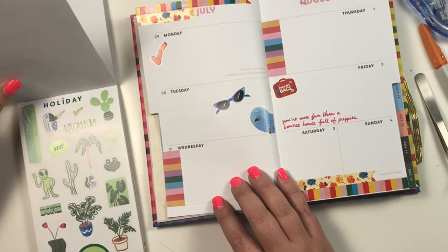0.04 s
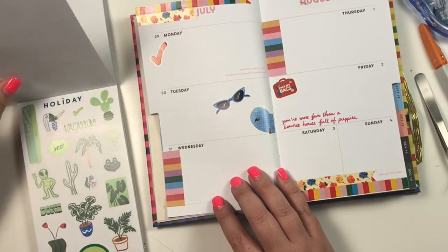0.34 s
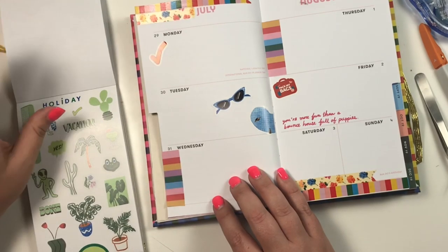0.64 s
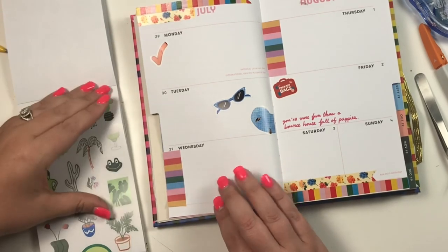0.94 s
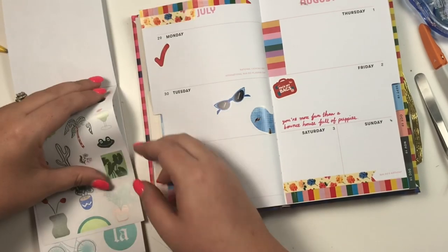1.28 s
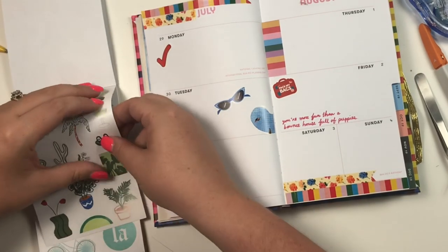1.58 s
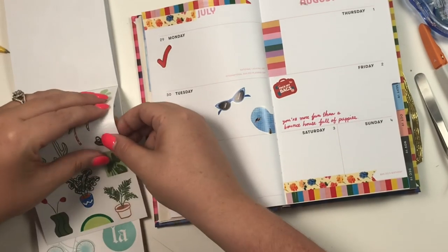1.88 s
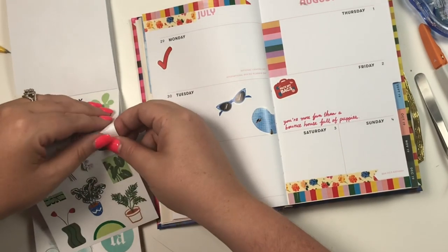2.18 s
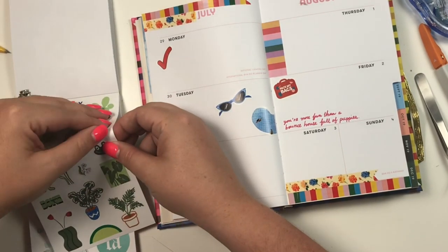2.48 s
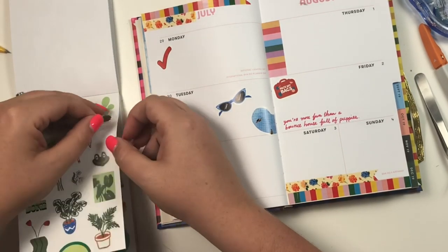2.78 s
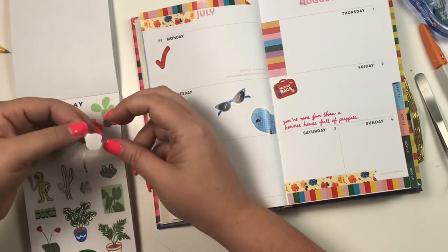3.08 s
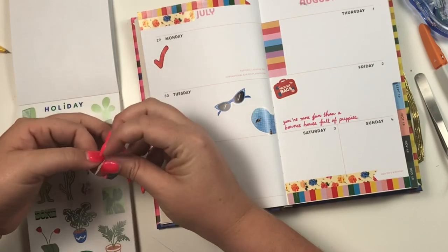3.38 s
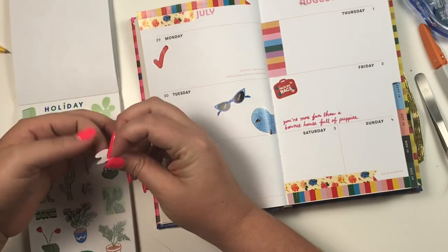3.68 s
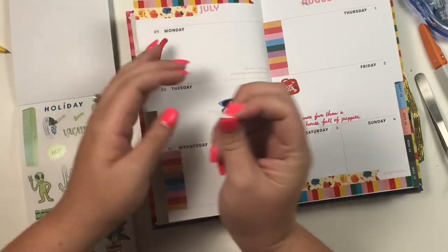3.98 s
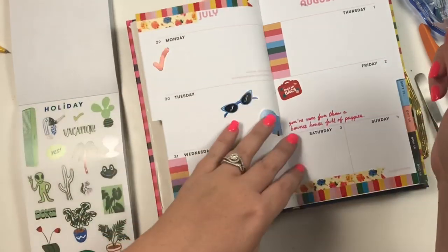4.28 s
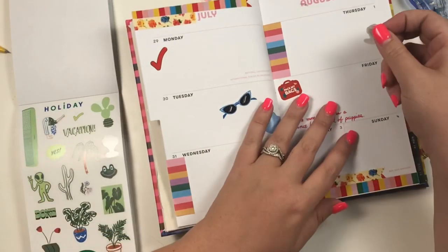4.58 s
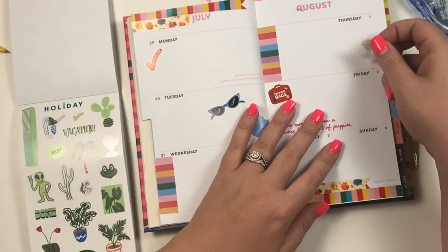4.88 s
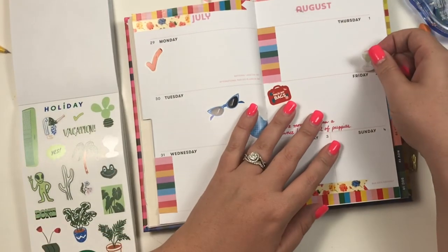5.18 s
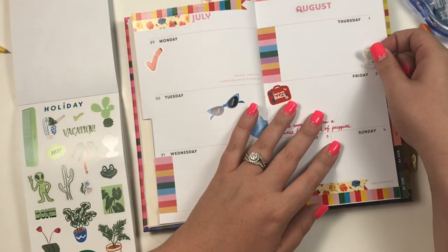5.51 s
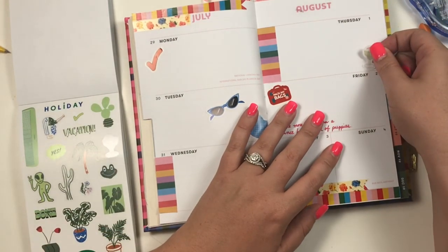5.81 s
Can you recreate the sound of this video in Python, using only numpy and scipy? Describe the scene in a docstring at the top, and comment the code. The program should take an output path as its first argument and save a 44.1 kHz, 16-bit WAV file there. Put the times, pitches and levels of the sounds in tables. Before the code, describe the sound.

A fan gives a low, steady hum with a soft rush of air throughout, in a small room with little echo. During the first second a stiff sticker sheet makes a few faint snaps. From about 0.9 seconds fingers slide over the paper with a soft hiss and tap the covers; at 1.4 seconds the sticker book bumps the desk with the loudest knock, and a smaller one follows at 1.7. Between about 2.1 and 2.6 seconds a sticker peels off in tiny, uneven ticks. Crisper snaps come at 2.9 and 3.8 seconds, each leaving a brief low ring. From 4.1 to 4.4 seconds a flat hand brushes and lands on the planner's pages, with a cluster of papery slaps and crackles and a faint deep sway of the desk. Light taps follow at 4.6 and 4.8, with one soft fingertip rub until 5. A last faint snap leaves only the fan.

```python
"""A fan hums in a small room while a sticker is moved from its glossy sheet to a paper planner on a desk.
The stiff backing gives a few faint snaps, then fingers slide over the sheets and knock on the covers;
the hardest knock bumps the sticker book against the desk. The glue lets go in tiny slips, and louder
snaps leave a low ring. A flat hand lands on the page and rocks the desk, and a fingertip
smooths the page with one last rub."""
import sys
import numpy as np
from scipy import signal
from scipy.fft import rfft, irfft
from scipy.io import wavfile

SR = 44100
rng = np.random.default_rng(int(sys.argv[2]) if len(sys.argv) > 2 else 0)


def digitize_waveform(pressure):
    """Quantize a signal to 16-bit integers and store it at the path in sys.argv[1].

    Rows of a 2-D input are taken as channels; values are limited to [-1, 1].
    """
    field = np.atleast_2d(pressure).T
    bounded = np.clip(field, -1, 1)
    quanta = np.round(bounded * 32767).astype(np.int16)
    wavfile.write(sys.argv[1], SR, quanta)


N = 266805
TIME_S = np.arange(N) / SR


def from_db(db):
    """Decibels to gain."""
    return 10 ** (np.asarray(db) / 20)


def unit_rms(x):
    """Scale to rms 1."""
    return x / np.sqrt(np.mean(x ** 2) + 1e-20)


def add(out, start_s, sound):
    """Mix a short sound in at its time."""
    at = round(start_s * SR)
    out[at:at + len(sound)] += sound[:N - at]


def envelope(start_s, attack_s, length_s, release_s):
    """Rise to 1, hold until the length is over, then die away."""
    t = TIME_S - start_s
    return np.clip(t / attack_s, 0, 1) * np.exp(-np.maximum(t - length_s, 0) / release_s)


def drift(rate_hz):
    """Random modulation that glides to a new value rate_hz times a second."""
    knots = rng.standard_normal(4096)
    return np.interp(TIME_S * rate_hz, np.arange(len(knots)), knots)


def grains(per_s, spread_db):
    """Friction texture: random tiny slips of uneven size and sign, at rms 1."""
    sizes = from_db(spread_db * np.minimum(rng.exponential(1, N), 4))
    signs = rng.choice([-1, 1], N)
    return unit_rms(sizes * signs * (rng.random(N) < per_s / SR))


def burst(decay_s, attack_s=0.00079):
    """Countless tiny contacts at once: a quick crackle with a flat spectrum."""
    t = np.arange(SR // 8) / SR
    shape = np.minimum(t / attack_s, 1) * np.exp(-np.maximum(t - attack_s / 2, 0) / decay_s)
    phases = np.angle(rfft(rng.standard_normal(len(t)) * shape, 2 * len(t)))
    return np.linalg.norm(shape) * irfft(np.exp(1j * phases))[:len(t)]


def response(eq, size=8192):
    """Minimum-phase impulse response of an EQ curve, at unit energy."""
    hz, db = np.transpose(eq)
    grid_hz = np.maximum(np.fft.rfftfreq(size, 1 / SR), 1)
    gains = from_db(np.interp(np.log(grid_hz), np.log(hz), db))
    cepstrum = irfft(np.log(gains))
    pulse = irfft(np.exp(rfft(2 * cepstrum[:size // 2], size)))
    return pulse / np.sqrt(np.sum(pulse ** 2))


def coloured(x, eq):
    """Shape a sound with an EQ curve."""
    return signal.fftconvolve(x, response(eq))[:N]


def resonance(x, pitch_hz, width_hz):
    """One resonance, with gain 1 at its peak."""
    r = np.exp(-np.pi * width_hz / SR)
    feedback = [1, -2 * r * np.cos(2 * np.pi * pitch_hz / SR), r * r]
    return signal.lfilter(np.array([1, 0, -1]) * (1 - r * r) / 2, feedback, x + 1e-18)


def ringing(x, modes):
    """A sound plus the ring of the body it touches."""
    return x + sum(from_db(db) * resonance(x, hz, width) for hz, width, db in modes)


# rotor tones: multiple_of_rotation, level_db
ROTOR_TONES = [(4, -89), (6, -59.5), (7, -63.5), (9, -52.5), (10, -62), (18, -71)]
# level ride on those tones: time_s, gain_db
ROTOR_SWELL = [(0, -2), (1.9, -0.5), (3.2, -6), (3.9, -5), (4.4, -1), (6.05, 3.5)]
# rush of moving air: freq_hz, gain_db
AIR_EQ = [(20, -39), (33, -20), (50, -1.5), (80, 0), (140, 2.5), (200, -4), (290, -4), (450, -12),
          (650, -16), (950, -24.5), (2000, -27.5), (3200, -32), (4700, -29), (7000, -34), (16000, -42)]


def fan(hum_hz, hum_db, air_db, waver_db):
    """The motor hums at twice the mains rate; the rotor's tones wander against it, over moving air."""
    hunting = np.cos(2 * np.pi * (TIME_S - 2.93) / 3.65)  # the speed hunts, once every 3.65 s
    turns_per_s = 14.82 + 0.22 * hunting
    angle = 2 * np.pi * np.cumsum(turns_per_s) / SR
    swell_db = np.interp(TIME_S, *np.transpose(ROTOR_SWELL))
    rotor = np.zeros(N)
    for multiple, level_db in ROTOR_TONES:
        level = from_db(level_db + swell_db + waver_db * drift(5))
        rotor += level * np.sin(multiple * angle + 2 * np.pi * rng.random())
    motor = from_db(hum_db) * np.sin(2 * np.pi * hum_hz * TIME_S)
    air = from_db(air_db) * coloured(rng.standard_normal(N), AIR_EQ)
    return np.sqrt(2) * (rotor + motor) + air


# stiff paper and sticker snapping: start_s, edge_db, body_db, flutter_hz, decay_s
SHEET_SNAPS = [(0.128, -72, -60.5, 750, 0.006), (0.275, -66, -67, 900, 0.0044),
               (0.48, -57, -50, 710, 0.0032), (0.569, -68, -63, 840, 0.0019), (0.82, -65, -57, 800, 0.0019),
               (0.979, -53, -55, 850, 0.0033), (1.7003, -52.5, -41, 764, 0.0039),
               (2.552, -67, -52, 900, 0.0017), (2.591, -46.5, -57, 870, 0.0021),
               (2.898, -44, -40, 673, 0.0023), (3.7598, -48, -45, 830, 0.0022),
               (3.7719, -39, -46, 807, 0.0023), (3.779, -57, -62, 815, 0.003),
               (4.102, -58, -50, 805, 0.0024), (4.1404, -55, -44, 696, 0.0027),
               (4.165, -59, -43, 780, 0.002), (4.3, -50, -53, 760, 0.0019), (4.436, -50, -38, 730, 0.0031),
               (5.25, -65, -62, 780, 0.0023)]
# a snap's papery body and its bright edge: freq_hz, gain_db
SNAP_BODY_EQ = [(150, -14), (300, 19), (600, 1.5), (1000, 2.5), (1300, 2), (2000, 3.5), (3200, -0.5),
                (5500, -1.5), (7000, -6.5), (16000, -40)]
SNAP_EDGE_EQ = [(1000, -74), (3000, 4), (5500, 7), (7500, 5), (10000, 5.5), (13000, 4), (16000, 4)]
# ring of the small stiff sheet: pitch_hz, width_hz, gain_db
SHEET_MODES = [(655, 100, 6), (1694, 63, 4.5), (2710, 100, -9), (3410, 180, 0), (4050, 160, -6),
               (5570, 250, -0.5), (12600, 1800, -3)]


def sheet_snaps(body_trim_db, edge_trim_db, flutter_feedback):
    """A buckling sheet lets go in a short crackle; the freed edge flutters and the sheet rings."""
    out = np.zeros(N)
    for start_s, edge_db, body_db, flutter_hz, decay_s in SHEET_SNAPS:
        body = from_db(body_db + body_trim_db) * coloured(burst(decay_s), SNAP_BODY_EQ)
        edge = from_db(edge_db + edge_trim_db) * coloured(burst(decay_s), SNAP_EDGE_EQ)
        flutter_comb = np.r_[1, np.zeros(round(SR / flutter_hz) - 1), -flutter_feedback]
        add(out, start_s, signal.lfilter([1], flutter_comb, body + edge))
    return ringing(out, SHEET_MODES)


# strokes of skin over paper: start_s, length_s, hiss_db, drag_db, gloss_re_hiss_db
FINGER_STROKES = [(0.917, 0.24, -61, -62.5, -14), (1.137, 0.19, -52.5, -61.5, -14),
                  (1.28, 0.19, -54, -61, -12.5), (1.46, 0.21, -59, -62, -9.5),
                  (1.675, 0.4, -65.5, -58.5, -9), (1.86, 0.059, -60, -59.5, -13),
                  (1.98, 0.046, -66, -58.5, -12), (2.073, 0.049, -62, -66, -8),
                  (2.23, 0.078, -65.5, -62.5, -14), (2.574, 0.093, -61.5, -71, -10),
                  (2.736, 0.058, -61.5, -63, -12), (3.072, 0.027, -60.5, -65, -14),
                  (3.96, 0.31, -60.5, -60, -9.5), (4.148, 0.13, -48.5, -53.5, -9.5),
                  (4.25, 0.021, -40.5, -44, -17.5), (4.33, 0.09, -62, -58, -11),
                  (4.421, 0.39, -58.5, -57, -12), (4.831, 0.15, -60, -69, -18)]
# fibre hiss, airy skating on the gloss and dull drag on the page: freq_hz, gain_db
HISS_EQ = [(500, 11), (2000, 3.5), (4500, 8.5), (5700, 7), (6500, -1.5), (8300, 3.5), (10500, -5.5),
           (13000, 0), (16000, -9)]
GLOSS_EQ = [(4000, -37), (7000, 0), (8500, -2), (10500, -2), (12500, 1), (14500, -4), (16000, 4)]
DRAG_EQ = [(250, -1), (550, -5), (850, -5.5), (1200, -8.5), (1550, -5.5), (2100, -5.5), (2700, -12.5),
           (4000, -19), (7000, -29), (16000, -40)]


def finger_slides(hiss_trim_db, drag_trim_db, uneven_db, patchy_db, sag_db_per_s):
    """Paper fibres hiss under moving skin, which skates in patches over the gloss and drags on the page."""
    hiss_level = drag_level = gloss_level = 0
    for start_s, length_s, hiss_db, drag_db, gloss_db in FINGER_STROKES:
        easing = from_db(-sag_db_per_s * np.maximum(TIME_S - start_s, 0))
        effort = easing * envelope(start_s, attack_s=0.013, length_s=length_s, release_s=0.023)
        hiss_level = np.maximum(hiss_level, from_db(hiss_db) * effort)
        drag_level = np.maximum(drag_level, from_db(drag_db) * effort)
        gloss_level = np.maximum(gloss_level, from_db(hiss_db + gloss_db) * effort)
    grip_db = uneven_db * drift(60)
    fibres = hiss_level * from_db(hiss_trim_db + grip_db) * grains(per_s=14000, spread_db=2.5)
    drag = drag_level * from_db(drag_trim_db + grip_db) * grains(per_s=5000, spread_db=1.8)
    skating = gloss_level * from_db(patchy_db * drift(25)) * grains(per_s=6000, spread_db=2.5)
    return coloured(fibres, HISS_EQ) + coloured(skating, GLOSS_EQ), coloured(drag, DRAG_EQ)


# ring of the planner's pages: pitch_hz, width_hz, gain_db
PAGE_MODES = [(356, 19, -5), (518, 17, 4.5), (626, 30, 3), (817, 69, 0.5), (1128, 73, -3.5), (1816, 62, 3),
              (2000, 28, -4.5), (2096, 22, -5), (2554, 54, 9), (3610, 90, -3)]


def page_ring(contact):
    """The stack of pages resonates under a touch."""
    return ringing(contact, PAGE_MODES)


# ring of the desk with the books on it: pitch_hz, width_hz, gain_db
DESK_MODES = [(99.7, 11.7, 19), (258, 13, 6), (359, 5.8, 12.5), (800, 53, -5.5), (1160, 200, 3.5),
              (2015, 130, -2), (3040, 200, 1), (3870, 100, -0.5), (5460, 150, 6)]


def desk_ring(contact):
    """The desk acts as a soundboard for the books lying on it."""
    return ringing(contact, DESK_MODES)


# finger knocks on the covers, and the low ring after the loudest sheet snaps (2.908 and 3.772 s):
# start_s, level_db, tick_re_level_db, pitch_hz, width_hz
KNOCKS_AND_SNAP_RINGS = [(0.985, -43, -4, 845, 70), (1.1545, -32, -7.5, 850, 120),
                         (1.166, -46, -20, 1180, 110), (1.291, -42.5, -21, 1190, 120),
                         (1.3858, -12, -16, 920, 378), (1.4015, -26, -21, 750, 260),
                         (1.591, -44.5, 0, 620, 260), (1.668, -45.5, -4, 1490, 300),
                         (1.701, -33, -17, 885, 260), (2.843, -42, -25, 646, 130),
                         (2.908, -47, -22, 685, 70), (3.762, -53, -12, 800, 185),
                         (3.772, -41, -15, 620, 50), (4.1445, -26.5, -10, 674, 150),
                         (4.233, -32.5, -17, 636, 120), (4.623, -38, -3, 836, 185),
                         (4.841, -39, -1.5, 840, 200), (4.848, -45, -22, 775, 60)]
# dull push and sharp tick: freq_hz, gain_db
PUSH_EQ = [(40, -33), (90, -0.5), (200, -5.5), (400, -15.5), (650, 1), (950, -7), (1400, -11), (2200, -8.5),
           (3000, -11), (5500, -21.5), (7500, -25.5), (16000, -42)]
TICK_EQ = [(500, -47), (1500, 14.5), (2500, 6), (5500, 1.5), (6800, -7), (16000, -18)]


def knocks_and_snap_rings(push_trim_db, tick_trim_db, push_delay_s, ring_db, ring_ref_width_hz):
    """A tick, then a dull push that rings at its own pitch; in a knock these are nail and fingertip."""
    ticks, rings = np.zeros(N), np.zeros(N)
    push = response(PUSH_EQ)
    for start_s, level_db, tick_db, pitch_hz, width_hz in KNOCKS_AND_SNAP_RINGS:
        add(ticks, start_s, from_db(level_db + tick_db + tick_trim_db) * burst(decay_s=0.0035))
        ring_gain = from_db(ring_db) * np.sqrt(ring_ref_width_hz / width_hz)
        swing = push + ring_gain * resonance(push, pitch_hz, width_hz)
        add(rings, start_s + push_delay_s, from_db(level_db + push_trim_db) * swing / np.abs(swing).max())
    return coloured(ticks, TICK_EQ) + rings


def cover_smear(x, below_hz, stages):
    """Bending waves in a stiff cover: the low ones travel slower and arrive a little later."""
    pole = np.exp(-2 * np.pi * below_hz / SR)
    allpass = [-pole, 1, 0, 1, -pole, 0]
    return signal.sosfilt([allpass] * stages, x + 1e-18)


# low notes of the desk's thud: pitch_hz, level_db, t60_s
THUD_MODES = [(153, -42, 0.095), (274, -40, 0.28), (363, -40.5, 0.14), (605, -29, 0.1)]


def book_thud(start_s):
    """The sticker book bumps the desk and sets off its low modes."""
    t, out = np.arange(SR // 2) / SR, np.zeros(N)
    for pitch_hz, level_db, t60_s in THUD_MODES:
        add(out, start_s, from_db(level_db - 60 * t / t60_s) * np.sin(2 * np.pi * pitch_hz * t))
    return out


# the glue letting go: start_s, level_db, decay_s
GLUE_SLIPS = [(1.79, -51, 0.0016), (2.0903, -40, 0.0013), (2.243, -48, 0.0018), (2.3258, -50.5, 0.0016),
              (2.3628, -44.5, 0.0012), (2.372, -46.5, 0.0014), (2.391, -48, 0.0018),
              (2.3975, -48.5, 0.0018), (2.4122, -46, 0.0016), (2.435, -51, 0.0022), (2.451, -48, 0.0034),
              (2.4588, -46.5, 0.0035), (2.4823, -48.5, 0.002), (2.5, -46.5, 0.0016), (2.519, -46, 0.0012),
              (2.5343, -44, 0.0015), (2.5517, -41, 0.0011), (2.842, -45, 0.0012), (2.884, -48, 0.0011)]
# tone of the sheet plucked by the glue: freq_hz, gain_db
GLUE_EQ = [(300, 1.5), (540, 5), (750, -16), (1050, 2), (1400, -3.5), (1800, 2), (2150, 2.5), (2800, -17),
           (4200, -10), (8000, -16), (16000, -15)]


def glue_peel(trim_db, soften_hz):
    """The glue holds, then gives way in a tick or a longer tear; each slip softly plucks the sheet."""
    plucks = np.zeros(N)
    for start_s, level_db, decay_s in GLUE_SLIPS:
        add(plucks, start_s, from_db(level_db + trim_db) * burst(decay_s))
    softened = signal.sosfilt(signal.butter(1, soften_hz, fs=SR, output="sos"), plucks)
    return coloured(softened, GLUE_EQ)


def desk_rock(start_s, pitch_hz, level_db):
    """The whole desk sways at its lowest mode under the weight of the hand."""
    level = from_db(level_db) * envelope(start_s, attack_s=0.04, length_s=0.04, release_s=0.29)
    wavering_hz = pitch_hz * (1 + 0.056 * drift(18))
    return level * np.sqrt(2) * np.sin(2 * np.pi * np.cumsum(wavering_hz) / SR)


# the hand landing, fingers first and then the palm: start_s, slap_db, brush_db, pitch_hz, ring_db
HAND_CONTACTS = [(4.123, -43.5, -66, 1250, 4), (4.131, -42.5, -56, 1190, 0), (4.138, -39.5, -44, 630, 6),
                 (4.147, -40.5, -46, 1140, 10), (4.164, -41.5, -50, 1080, 6), (4.183, -62, -58, 1850, 0),
                 (4.268, -53, -35, 2300, 0), (4.2772, -25, -27, 827, 6), (4.2821, -26.5, -32, 2040, 2),
                 (4.2909, -27, -28, 520, -4), (4.303, -27.5, -40, 864, 5), (4.3122, -33.5, -60, 1140, 10),
                 (4.334, -47, -62, 370, 12), (4.354, -43, -56, 1820, -5)]
# fleshy slap and papery brush: freq_hz, gain_db
SLAP_EQ = [(30, -15), (50, -17), (100, -9.5), (220, 3), (430, -0.5), (850, 1.5), (1150, -2), (1500, -2),
           (2200, 2), (3200, -10), (4000, -10), (5500, -33), (7000, -30), (16000, -73)]
BRUSH_EQ = [(1200, -25), (2600, 8), (3800, 10), (5300, 6), (6300, -2), (9000, -30), (16000, -34)]


def hand_landing(slap_trim_db, brush_trim_db, ring_width_hz):
    """The hand presses loose pages together; each spot gives a woody ring, and pages catch and crackle."""
    attack_s, decay_s = 0.0017, 0.0051  # soft flesh makes each contact swell and fade
    presses, brushes = np.zeros(N), np.zeros(N)
    for start_s, slap_db, brush_db, pitch_hz, ring_db in HAND_CONTACTS:
        press = from_db(slap_db + slap_trim_db) * burst(decay_s, attack_s)
        add(presses, start_s, press + from_db(ring_db) * resonance(press, pitch_hz, ring_width_hz))
        add(brushes, start_s, from_db(brush_db + brush_trim_db) * burst(decay_s, attack_s))
    catching = unit_rms(from_db(5 * drift(450)))
    return coloured(presses, SLAP_EQ), coloured(brushes * catching, BRUSH_EQ)


# tone of a fingertip smoothing the page: freq_hz, gain_db
RUB_EQ = [(200, -1), (330, 2), (500, -6), (850, 5.5), (1200, -3.5), (1900, 2.5), (2250, 3), (2600, -8.5),
          (4000, -10), (7000, -25), (16000, -45)]


def fingertip_rub(start_s, level_db, uneven_db):
    """The pad of a finger sticks and slips on the page, swelling in and easing off."""
    swell = envelope(start_s, attack_s=0.024, length_s=0.16, release_s=0.032)
    pressure = swell * from_db(level_db + uneven_db * drift(60))
    return coloured(pressure * grains(per_s=2700, spread_db=0.5), RUB_EQ)


def small_room(x, split_hz, low_db, low_t60_s, treble_db, treble_t60_s, early_db, early_decay_s):
    """Adds dense early reflections off the desk's clutter and a short two-band tail."""
    t = np.arange(SR // 2) / SR
    tail_noise, early_noise = rng.standard_normal((2, len(t)))
    low = signal.sosfilt(signal.butter(2, split_hz, fs=SR, output="sos"), tail_noise)
    low_tail = low * from_db(low_db - 60 * t / low_t60_s)
    treble_tail = (tail_noise - low) * from_db(treble_db - 60 * t / treble_t60_s)
    early = early_noise * from_db(early_db) * np.exp(-t / early_decay_s)
    reflections = (low_tail + treble_tail + early) * (t > 0.003)  # 3 ms pre-delay
    return x + signal.fftconvolve(x, reflections)[:N]


def scene():
    """Contacts on the page sound through the desk; the sticker, brush and hiss go straight into the air."""
    rub_send = 0.35  # to the page ring: the rubbing finger damps the pages
    hit_send, glue_send = 0.68, 0.45  # to the room: hits stay drier, and cupped fingers cover the glue
    hiss, drag = finger_slides(hiss_trim_db=-3.5, drag_trim_db=-7.5, uneven_db=3.0, patchy_db=4.5,
                               sag_db_per_s=20)
    hits = knocks_and_snap_rings(push_trim_db=-2.0, tick_trim_db=-5.0, push_delay_s=0.001182,
                                 ring_db=12.5, ring_ref_width_hz=210)
    desk_hits = desk_ring(cover_smear(hits, below_hz=1330, stages=4)) + book_thud(start_s=1.392)
    slap, brush = hand_landing(slap_trim_db=-2.5, brush_trim_db=-3.5, ring_width_hz=62)
    rub = fingertip_rub(start_s=4.80, level_db=-56, uneven_db=1.5)
    pages = page_ring(slap + drag + rub_send * rub) + (1 - rub_send) * rub
    glue = glue_peel(trim_db=2.5, soften_hz=3500)
    snaps = sheet_snaps(body_trim_db=3.5, edge_trim_db=5.0, flutter_feedback=0.28)
    room_bus = snaps + hiss + brush + desk_ring(pages) + hit_send * desk_hits + glue_send * glue
    in_room = small_room(room_bus, split_hz=4000, low_db=-33, low_t60_s=0.23, treble_db=-39.5,
                         treble_t60_s=0.31, early_db=-28.5, early_decay_s=0.0081)
    close = (1 - hit_send) * desk_hits + (1 - glue_send) * glue
    sway = desk_rock(start_s=4.08, pitch_hz=51.7, level_db=-48.5)
    fan_bed = fan(hum_hz=119.98, hum_db=-47.0, air_db=-52.5, waver_db=2.5)
    return (in_room + close + sway + fan_bed)[None]


def record(dry):
    """A steep low-pass cuts the top above 16 kHz."""
    return signal.sosfilt(signal.ellip(12, .1, 80, 16000, fs=SR, output="sos"), dry)


dry = scene()
out = record(dry)
digitize_waveform(out)
```